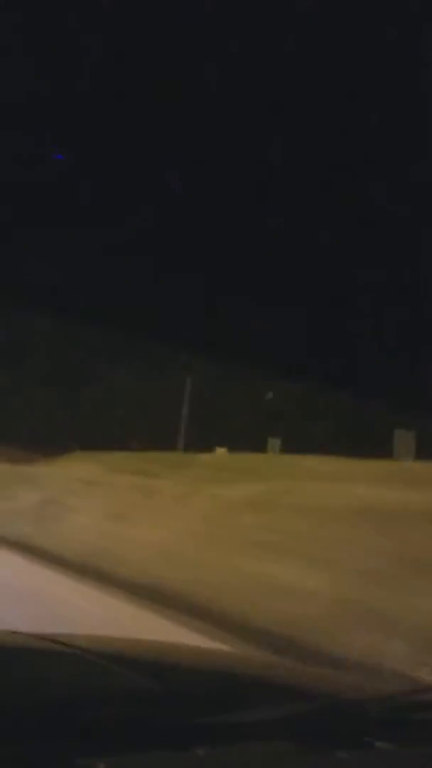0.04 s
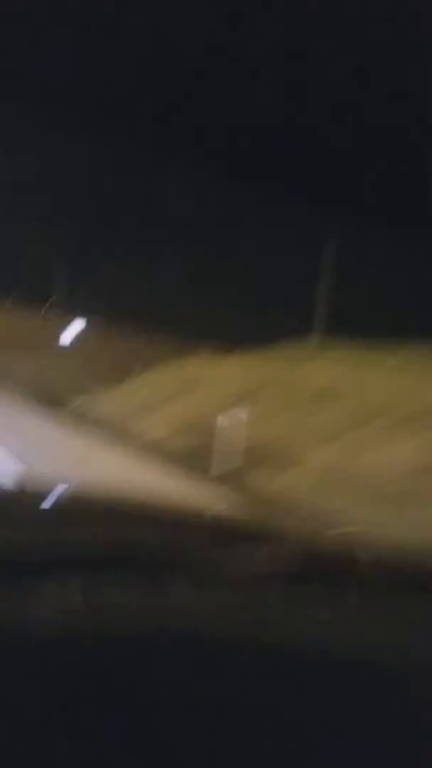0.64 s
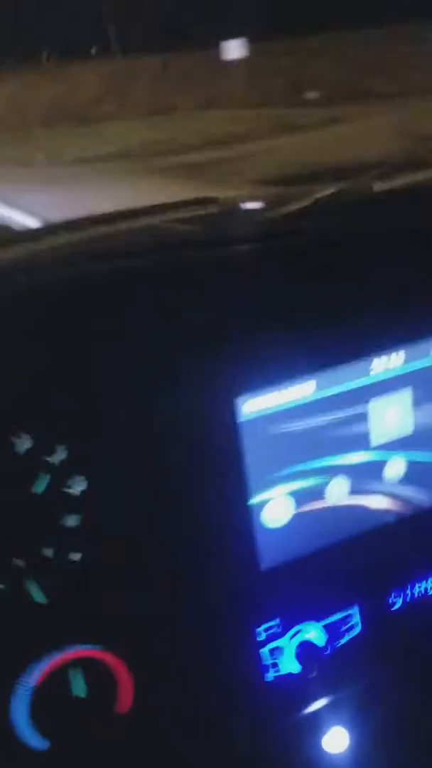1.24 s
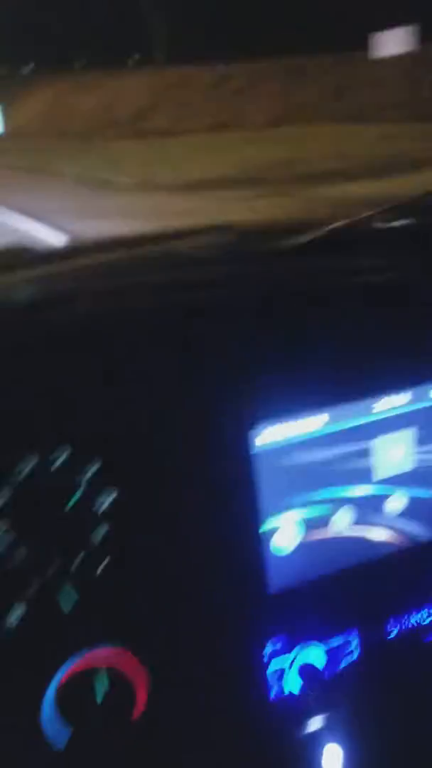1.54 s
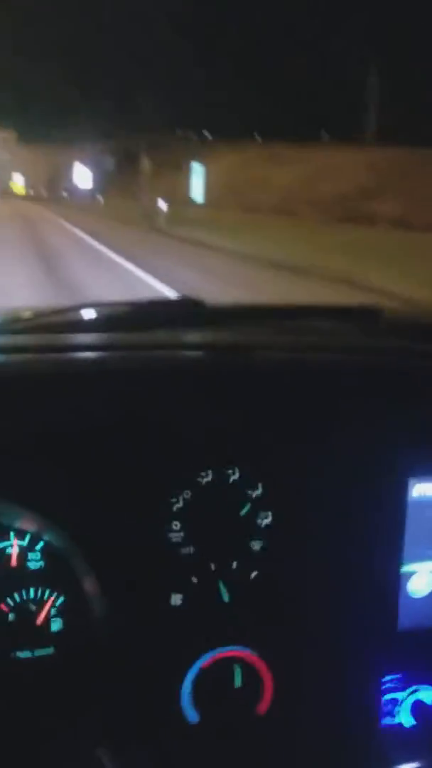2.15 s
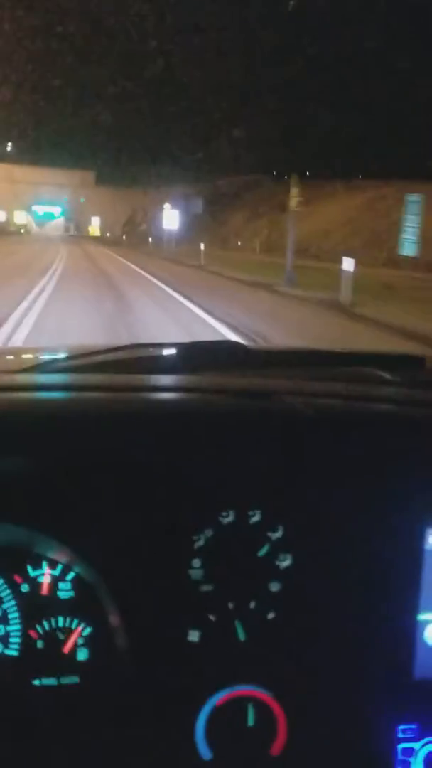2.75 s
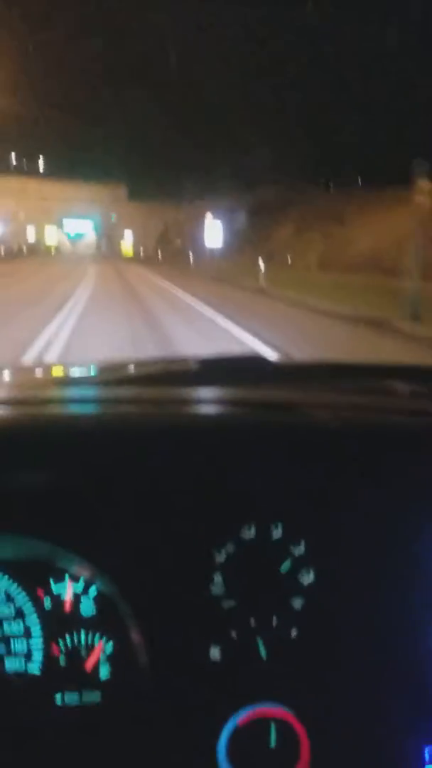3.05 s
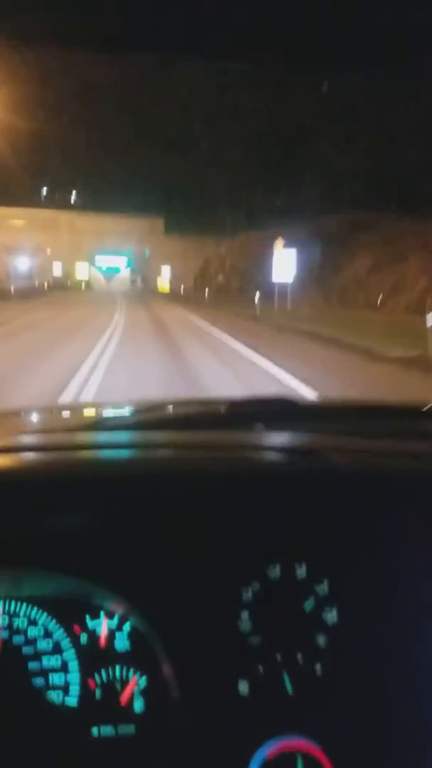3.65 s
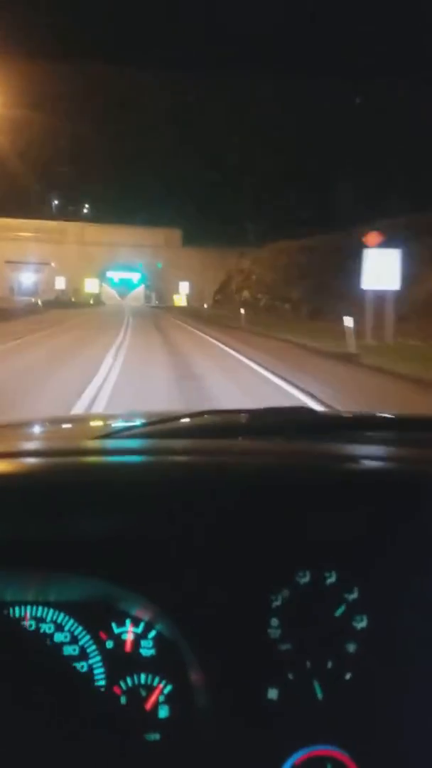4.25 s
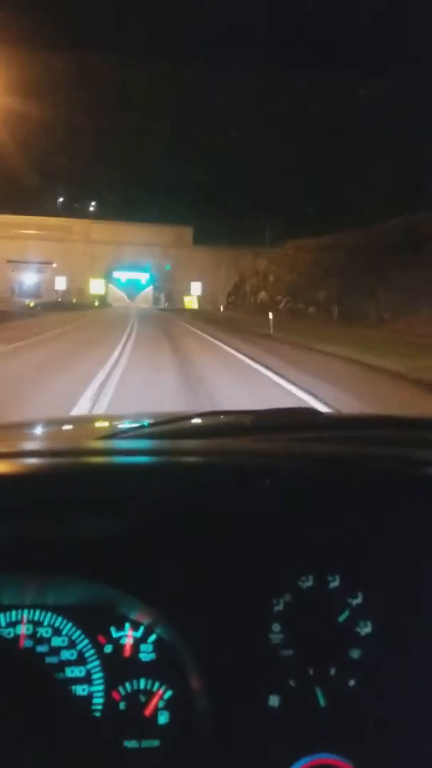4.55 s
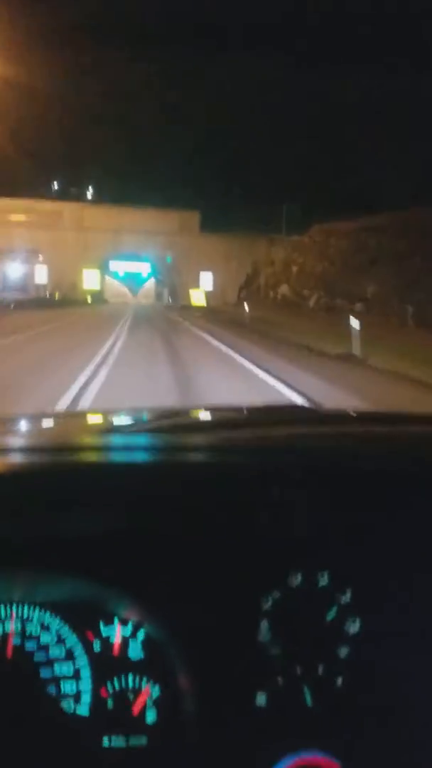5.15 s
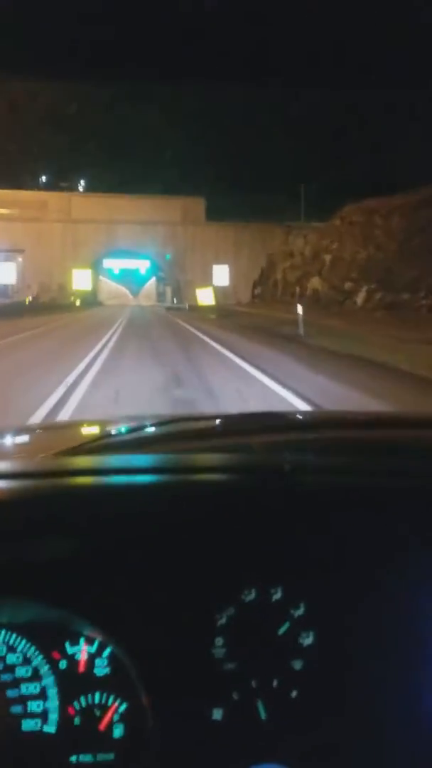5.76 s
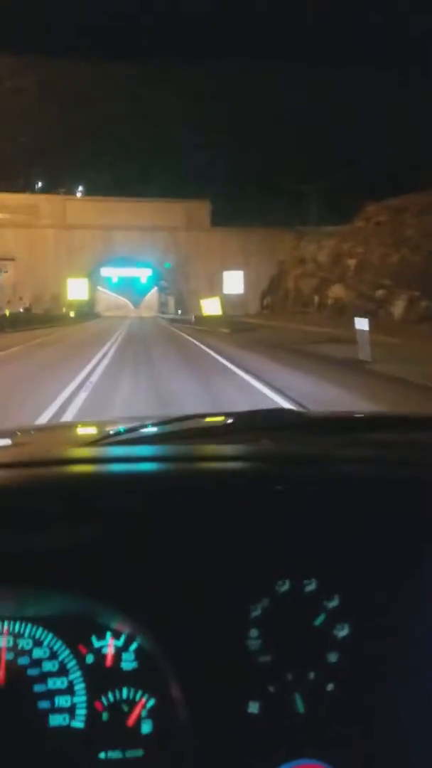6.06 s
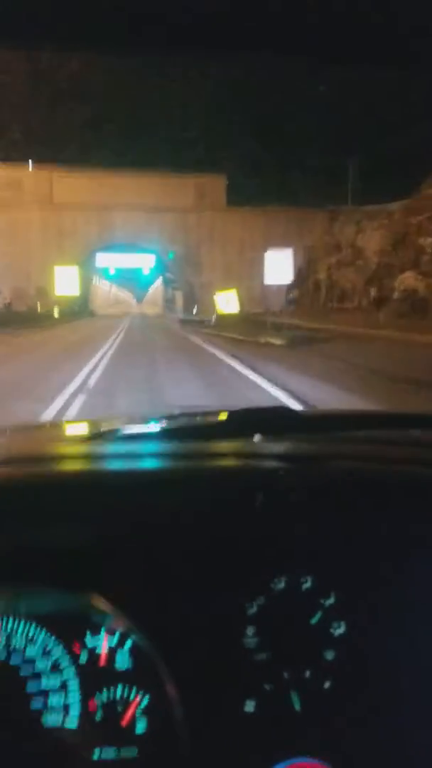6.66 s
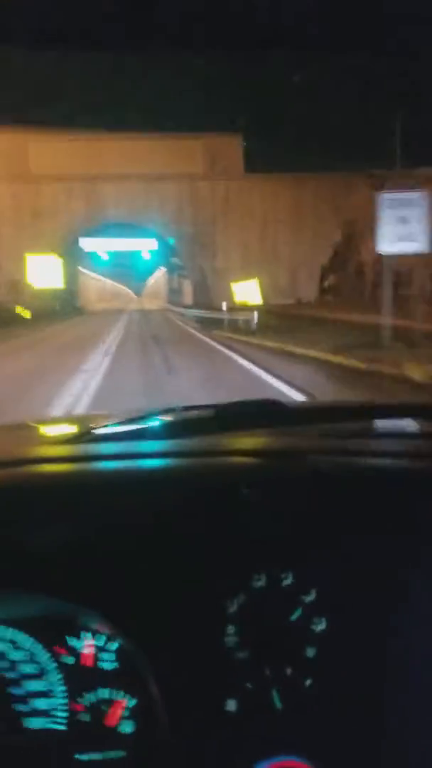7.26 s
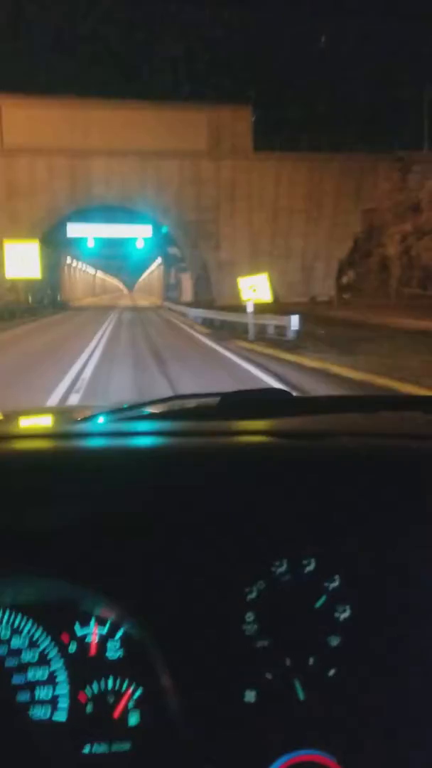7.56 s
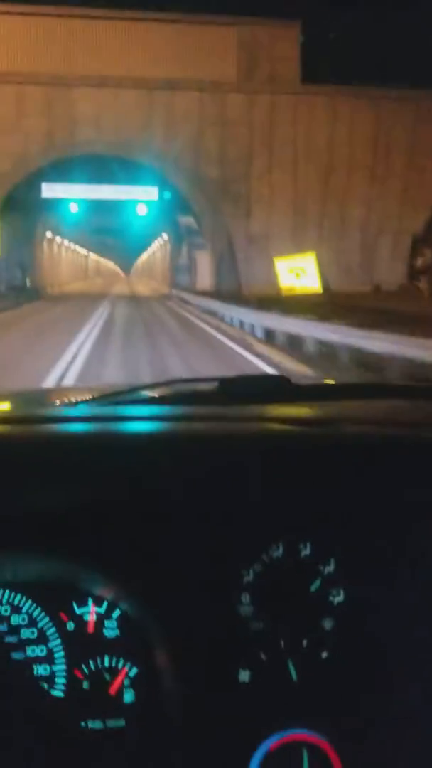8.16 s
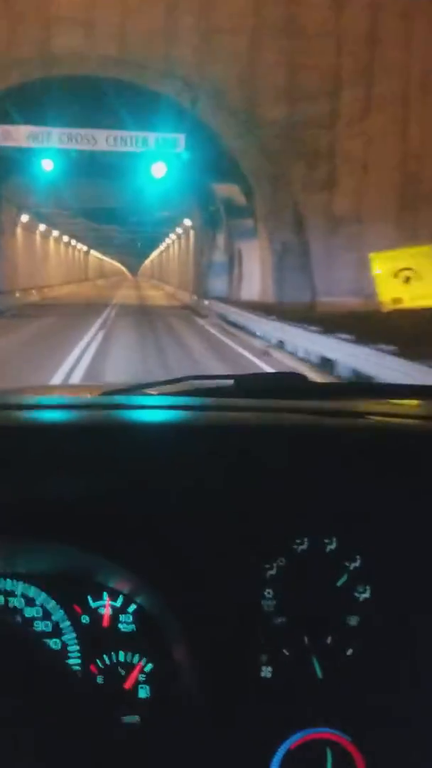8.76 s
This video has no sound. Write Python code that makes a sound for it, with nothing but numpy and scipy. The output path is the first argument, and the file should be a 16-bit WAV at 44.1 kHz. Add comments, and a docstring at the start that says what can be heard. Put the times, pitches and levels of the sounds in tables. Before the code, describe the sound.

Inside the cab of a diesel truck at highway speed, the engine drones low and steady over tyre rumble, road roar and light air hiss. About a second in, a finger thumps the microphone and everything dips briefly. A thin, very high turbo whistle climbs, peaks past the middle and sinks again, while loose trim gives occasional faint ticks.

```python
"""The exhaust drone of a loaded six-cylinder diesel truck, heard in the cab at highway speed.
Each firing pushes the cab air, and uneven cylinders add clatter between the harmonics.
Under it lies a bed of tyre rumble, cab boom, road roar and air hiss; on top, the turbo whistle
climbs and sinks with the boost, and loose trim ticks. Early on a finger bumps the microphone
and the gain control ducks everything for over a second."""
import sys
import numpy as np
from scipy import signal
from scipy.fft import rfft, irfft, next_fast_len
from scipy.io import wavfile
from scipy.ndimage import uniform_filter1d, minimum_filter1d, map_coordinates

SR = 44100
rng = np.random.default_rng(int(sys.argv[2]) if len(sys.argv) > 2 else 0)


def generate_wav(sig):
    """Save sig (samples, or channels by samples) to the path in sys.argv[1] as 16-bit PCM at SR."""
    pcm = np.round(np.clip(np.atleast_2d(sig).T, -1, 1) * 32767).astype(np.int16)
    wavfile.write(sys.argv[1], SR, pcm)


N = 392931

# The ride of road surface and air flow. Each row: time in seconds, boom and roar in relative dB.
ROAD_LEVELS = [(0, -23, -25.5), (1.2, -22, -28.5), (2.9, -24, -28), (4.0, -22, -27), (5.0, -22.5, -28),
               (6.3, -23, -28), (6.8, -22.5, -27.5), (7.9, -21, -26.9), (8.2, -24, -28),
               (8.9, -23.5, -27.5)]
# Colours of the tyre rumble and the cab boom. Each row: frequency in Hz, relative level in dB.
RUMBLE_COLOUR = [(8, -23), (18, -9), (27, 1), (42, -3), (60, -1.5), (80, -6), (120, -33), (300, -90)]
BOOM_COLOUR = [(50, -40), (80, -4.5), (105, -0.5), (135, 0), (165, 1.3), (200, -2), (250, -7.5), (320, -7),
               (420, -16), (700, -37.5), (2000, -90)]
# Colours of the road roar and the air hiss. Each row: frequency in Hz, left and right in relative dB.
ROAR_COLOUR = [(150, -14, -16), (342, 4, 0.5), (480, 7, 0), (582, 7, 3.5), (780, 2, -6), (900, -2, 1),
               (990, -0.5, -2.5), (1200, 1, -0.5), (1530, -3, -2), (1880, -4.5, -1.5), (2405, -7.5, -7.5),
               (3230, -14, -17.5), (5000, -42, -40), (9000, -90, -90)]
HISS_COLOUR = [(1500, -30, -30), (2790, -2, -4.5), (3500, -3.5, -3.5), (4450, -0.5, -9.5), (4950, -12, -9),
               (5540, -10.5, -7.5), (6080, -8, -15), (6750, -2, -26), (7430, -12, -23), (8200, -19.5, -21),
               (9440, -12.5, -27), (11000, -18.5, -18), (13000, -14, -24), (15500, -27.5, -36)]
# Stereo image of the cab noise. Each row: frequency in Hz, left-right correlation (1 is mono).
CAB_CORRELATION = [(30, 0.82), (90, 0.88), (170, 1), (280, 0.76), (550, 0.65), (1100, 0.27), (2200, 0.28),
                   (4500, 0), (12000, 0)]
# Ticks of loose trim. Each row: start in seconds, relative level in dB, send to the body in dB.
TRIM_TICKS = [(0.755, -28, -6), (0.894, -36, 16), (1.642, -25, -6), (3.115, -28.5, -7), (5.119, -27, -8),
              (5.630, -30, -8), (5.667, -28, -8), (6.056, -32, -6), (6.445, -27, -6), (6.782, -24, -3),
              (7.009, -23.5, 2), (7.918, -23, 0), (8.252, -21.5, -7), (8.368, -28, -6), (8.794, -16, -12)]
# EQ on a tick's snap. Each row: frequency in Hz, gain in dB.
SNAP_COLOUR = [(2000, -30), (5000, -2.5), (7500, -2), (10000, -1), (13000, -2), (16000, -22)]
# Finger thumps. Each row: start in seconds, pitch in Hz, peak in dB before limiting, t60 in seconds.
FINGER_BUMPS = [(0.8715, 86, 10, .06), (0.941, 130, 1.5, 0.068)]
# The turbo spools up, surges and sinks back. Each row: time in seconds, blade tone in Hz.
TURBO_PITCH = [(0, 9130), (1, 9840), (2.3, 10430), (3.4, 11060), (4.68, 11450), (5.5, 12470), (5.85, 12820),
               (6.15, 12920), (6.35, 12750), (6.65, 12290), (7, 11890), (7.4, 11650), (8, 11490),
               (8.9, 11075)]
# The turbo's level follows its speed, up and down alike. Each row: blade tone in Hz, relative dB.
TURBO_LEVEL = [(9100, -67), (10250, -58), (10550, -53.5), (11350, -52.5), (11650, -50.5), (11950, -47.5),
               (12450, -43.3), (12900, -45)]
# Lines from uneven cylinders and upper firing harmonics. Each entry: a multiple of the cycle rate.
CYCLE_ORDERS = [2, 3, 8, 9, 11, 15, 20, 22, 24, 26, 28, 30, 36, 38, 39, 40, 43, 45]
# Colour of those lines. Each row: frequency in Hz, relative level in dB.
CLATTER_COLOUR = [(28, -38), (43, -26.5), (110, -29.5), (130, -25), (215, -35.5), (340, -37.5),
                  (430, -39.5), (520, -43), (650, -47)]
# The revs creep up. Each row: time in seconds, firing rate in Hz.
FIRING_RATE = [(0, 85.23), (2, 85.22), (3.6, 85.38), (5, 86.05), (6, 86.57), (7, 86.86), (8, 87.05),
               (8.9, 87.05)]
# The drone swells under load, then eases. Each row: time in seconds, harmonics 1 and 2 in dB.
DRONE_LEVELS = [(0, -15.5, -15.5), (0.7, -15.8, -23), (1.1, -13.5, -22.5), (2.4, -15.5, -22.1),
                (3.6, -13.4, -22.5), (4.8, -13.0, -18.1), (5.3, -12.5, -21.8), (6.05, -13.5, -19.5),
                (6.4, -17, -20), (7.85, -15, -20), (8.9, -19.5, -21.5)]


def amp(db):
    """Decibels to gain."""
    return 10 ** (np.asarray(db) / 20)


def unit(x):
    """Scaled to rms 1."""
    return x / np.sqrt(np.mean(x ** 2) + 1e-20)


def along(points, hz, column=1):
    """One column of a frequency table, read on a log axis."""
    columns = np.transpose(points)
    return np.interp(np.log(hz + 1), np.log(columns[0] + 1), columns[column])


def curves(rows):
    """One automation curve for each column after the time."""
    times, *columns = np.transpose(rows)
    return [np.interp(np.arange(N) / SR, times, column) for column in columns]


def wobble(rate):
    """A smooth random curve, rate knots a second."""
    return map_coordinates(rng.standard_normal(int(N * rate / SR) + 4), [np.arange(N) * rate / SR])


def filtered(x, response):
    """EQ: response gives the gain at each frequency in Hz."""
    size = next_fast_len(N + SR // 2)
    return irfft(rfft(x, size) * response(np.fft.rfftfreq(size, 1 / SR)), size)[..., :N]


def pan(left_db):
    """Left and right gains for a level difference."""
    return amp(np.array([[.5], [-.5]]) * left_db)


def cab_noise(colour, patchy_db):
    """Coloured stereo noise with drifting patches of gain; its centre has rms 1."""
    def mid_side_gains(hz):
        angle = np.arccos(np.clip(along(CAB_CORRELATION, hz), -1, 1)) / 2
        return np.array([np.cos(angle), np.sin(angle)])

    spectra = signal.stft(rng.standard_normal((2, N)), nperseg=512)[2]
    patches = uniform_filter1d(rng.standard_normal(spectra.shape[1:]), size=5, axis=0)
    patches = uniform_filter1d(patches, size=14, axis=1)
    noise = signal.istft(spectra * amp(patchy_db * unit(patches)), nperseg=512)[1][:, :N]
    mid, side = filtered(noise, mid_side_gains)
    stereo = np.array([mid + side, mid - side])
    # a colour with one level column serves both sides
    stereo = filtered(stereo, lambda hz: amp([along(colour, hz), along(colour, hz, column=-1)]))
    return stereo / np.std(stereo.mean(axis=0))


def cab_echoes(x, gain=0.082, count=8):
    """Weak echoes from the windows and dash comb the sound, differently on each side."""
    delays = rng.integers(SR // 500, SR // 70, (2, count))
    echoes = [sum(np.pad(ear, (lag, 0))[:N] for lag in lags) for ear, lags in zip(x, delays)]
    return x + gain * np.array(echoes)


def road(firing_phase, boom_db, roar_db, rumble_db=-25, hiss_offset_db=-14):
    """Tyres shake and boom through the cab; roar and hiss pulse slightly with the diesel knock."""
    rumble = amp(rumble_db + .5 * wobble(2.47)) * cab_noise(RUMBLE_COLOUR, patchy_db=1.0)
    boom = amp(boom_db + 3.0 + .5 * wobble(4)) * cab_noise(BOOM_COLOUR, patchy_db=0.45) * pan(1.5)
    knock = 1 + .035 * np.cos(firing_phase) + 0.046 * np.cos(firing_phase / 2)
    flow_db = roar_db + .15 * wobble(4)
    roar_gain = amp(flow_db - 0.5 + 0.45 * wobble(28))
    roar = roar_gain * cab_echoes(cab_noise(ROAR_COLOUR, patchy_db=0.5))
    hiss_gain = amp(flow_db + hiss_offset_db + 0.66 * wobble(35))
    hiss = hiss_gain * cab_echoes(cab_noise(HISS_COLOUR, patchy_db=0.77))
    return rumble + boom + knock * (roar + hiss)


def trim_ticks(t60_s=0.025, body_hz=4300):
    """Loose plastic trim ticks: a bright snap with a little resonant body."""
    snaps, bodies = np.zeros((2, 2, N + SR))
    t = np.arange(SR // 20) / SR
    for start_s, db, body_db in TRIM_TICKS:
        burst = amp(db - 60 * t / t60_s) * rng.standard_normal((2, len(t)))
        start = round(start_s * SR)
        snaps[:, start:start + len(t)] += burst
        bodies[:, start:start + len(t)] += amp(body_db) * burst
    snap = filtered(snaps[:, :N], lambda hz: amp(along(SNAP_COLOUR, hz)))
    body = filtered(bodies[:, :N], lambda hz: 1 / (1 + 1j * (hz - body_hz) / 700))
    return (amp(-2.0) * snap + amp(1) * body) * pan(3.9)


def finger_bumps(attack_s=0.0027):
    """Each thump is a short damped swing of pressure in the right microphone only."""
    right = np.zeros(N)
    for start_s, hz, peak_db, t60_s in FINGER_BUMPS:
        t = np.maximum(np.arange(N) / SR - start_s, 0)
        swing = np.sin(2 * np.pi * hz * t) * amp(-60 * t / t60_s) * (1 - np.exp(-t / attack_s))
        right += amp(peak_db) * swing / np.abs(swing).max()
    return np.array([np.zeros(N), right])


def noise_band(phase, half_width_hz):
    """A stereo band of noise that rides the pitch of a running phase."""
    noise = rng.standard_normal((2, 2, N))
    a, b = filtered(noise, lambda hz: 1 / np.hypot(1, np.square(hz / half_width_hz)))
    return unit(a * np.cos(phase) + b * np.sin(phase))


def turbo(tone_growth=0.32, air_below_hz=230, air_top_hz=13700):
    """The blades whistle and flutter inside a band of rushing intake air that glides with them."""
    blade_hz = uniform_filter1d(curves(TURBO_PITCH)[0], size=6000) + 7 * wobble(20)
    db = along(TURBO_LEVEL, blade_hz)
    phase = 2 * np.pi * np.cumsum(blade_hz) / SR
    whistle = unit(noise_band(phase, half_width_hz=11) + .7 * np.sin(phase))
    # the harder the turbo works, the further the tone stands out of the air
    whistle *= amp(tone_growth * (db - db.mean()) + 1.7 * wobble(12))
    fringe = noise_band(phase, half_width_hz=130)
    air = noise_band(phase - 2 * np.pi * air_below_hz * np.arange(N) / SR, half_width_hz=800)
    air = filtered(air, lambda hz: 1 / (1 + (hz / air_top_hz) ** 20))
    return amp(db) * (amp(-1.2) * whistle + amp(-3.5) * fringe + amp(0.3) * air) * pan(6.6)


def engine_clatter(firing_phase, swell_db, cylinders=6):
    """Unequal cylinders repeat every two crank turns, adding wavering lines around the harmonics."""
    cycle_phase = firing_phase / cylinders
    cycle_hz = FIRING_RATE[0][1] / cylinders
    lines = np.zeros(N)
    for order in CYCLE_ORDERS:
        gain = amp(along(CLATTER_COLOUR, order * cycle_hz) + 1.7 * wobble(2.38))
        lines += gain * np.sin(order * cycle_phase + rng.uniform(0, 2 * np.pi) + 0.14 * wobble(5))
    return np.sqrt(2) * lines * amp(swell_db - 5.0) * pan(1.4)


def exhaust(firing_phase, waver_db=0.34, third_mean_db=-35, third_growth=1.8):
    """Every firing pushes the cab air: three crank-locked harmonics, the third most eager under load."""
    first_db, second_db = curves(DRONE_LEVELS)
    third_db = third_mean_db + third_growth * (first_db - first_db.mean()) + 2.0 * wobble(3.06)
    drone = np.zeros(N)
    for harmonic, db in enumerate([first_db, second_db, third_db], start=1):
        drone -= amp(db + waver_db * wobble(13)) * np.sin(harmonic * firing_phase)
    return np.sqrt(2) * drone * pan(0.87)


def scene():
    """The mix from the driver's seat: engine, road, turbo and trim, plus the finger thumps."""
    firing_phase = 2 * np.pi * np.cumsum(curves(FIRING_RATE)[0]) / SR
    boom_db, roar_db = curves(ROAD_LEVELS)
    engine = exhaust(firing_phase) + engine_clatter(firing_phase, roar_db - np.median(roar_db))
    return engine + road(firing_phase, boom_db, roar_db) + turbo() + trim_ticks() + finger_bumps()


def gain_control(x, duck_db=-6, hold_s=1.09, release_s=0.4, margin_db=3):
    """Peaks over full scale are limited at once; a hard overload holds the gain down, then lets go."""
    needed_db = -20 * np.log10(np.maximum(np.abs(x).max(axis=0), 1))
    limit_db = uniform_filter1d(minimum_filter1d(needed_db, size=400), size=100)
    overload_db = np.clip(limit_db + margin_db, duck_db, 0)
    half_hold, half_release = int(hold_s * SR) // 2, int(release_s * SR) // 2
    held_db = minimum_filter1d(overload_db, 2 * half_hold + 1, origin=half_hold, mode="constant")
    release_db = uniform_filter1d(held_db, 2 * half_release + 1, origin=half_release, mode="constant")
    return x * amp(np.min([limit_db, held_db, release_db], axis=0))


def record(dry, top_hz=15750):
    """The master chain: gain control, then a brick-wall high cut."""
    return filtered(gain_control(dry), lambda hz: hz < top_hz)


dry = scene()
out = record(dry)
generate_wav(out)
```